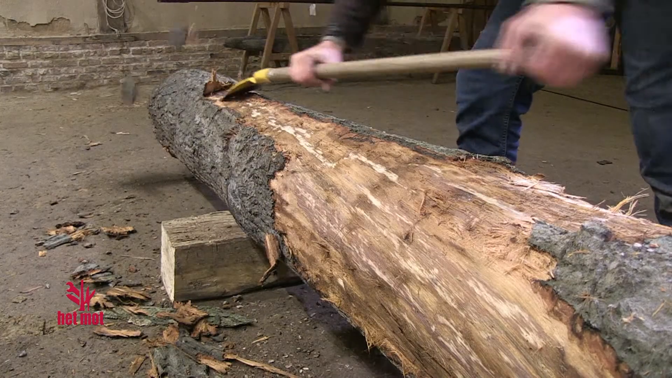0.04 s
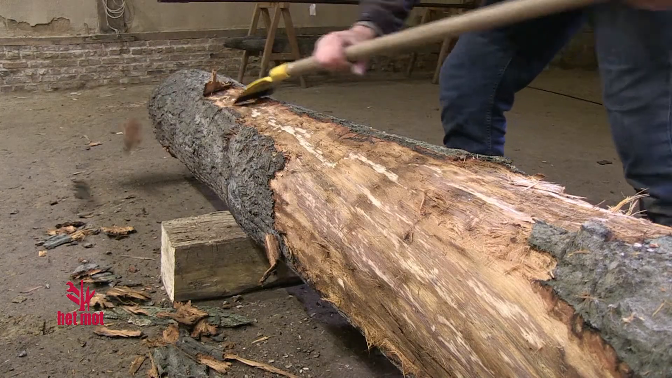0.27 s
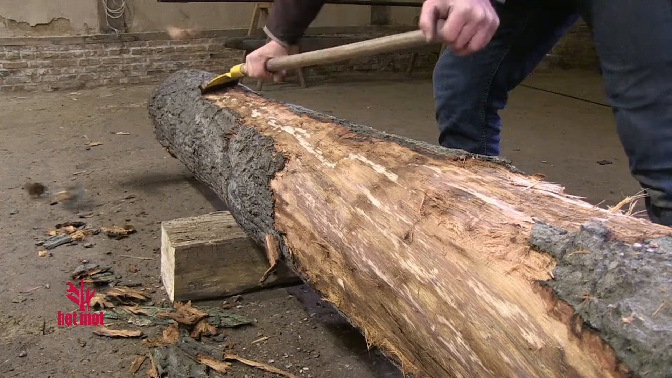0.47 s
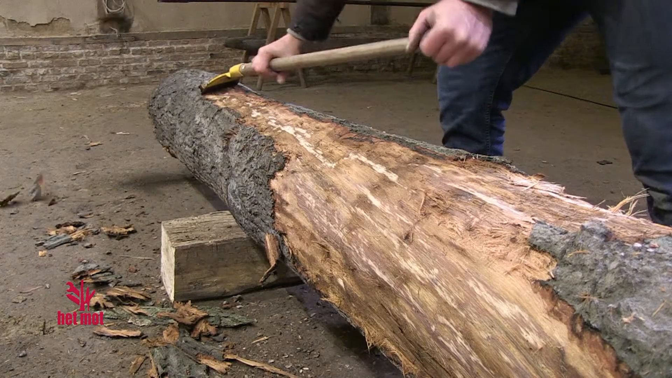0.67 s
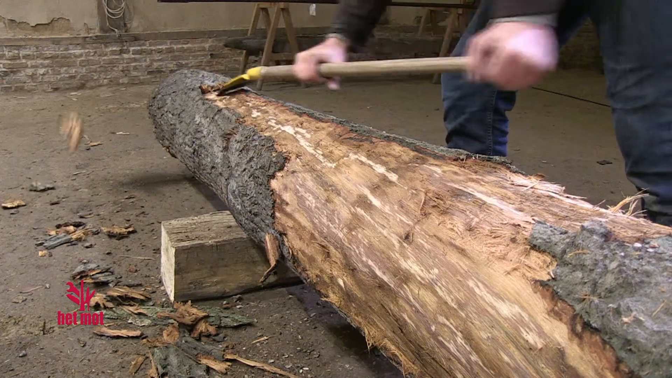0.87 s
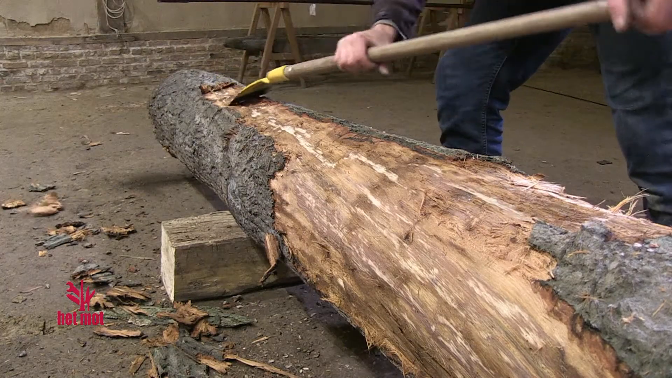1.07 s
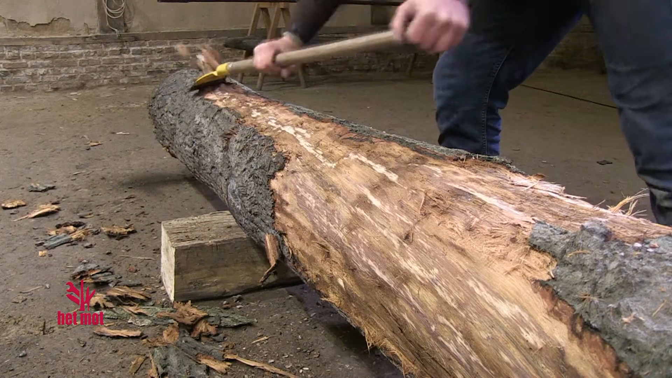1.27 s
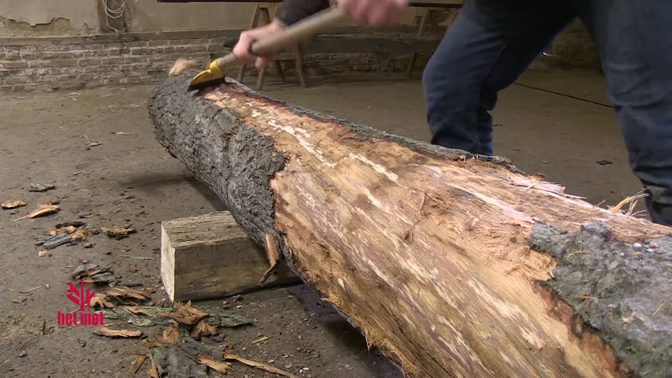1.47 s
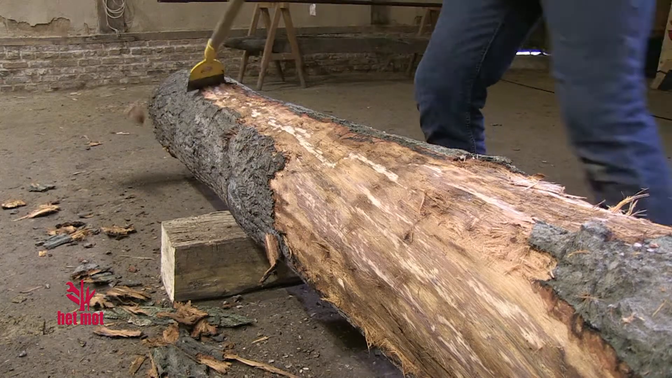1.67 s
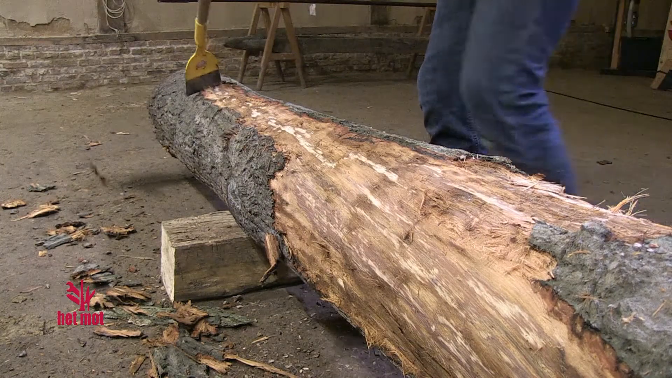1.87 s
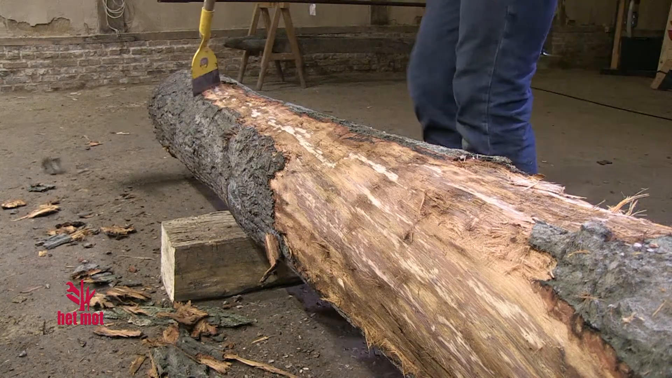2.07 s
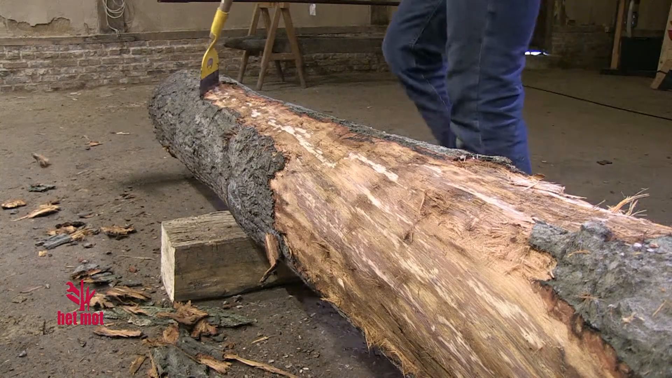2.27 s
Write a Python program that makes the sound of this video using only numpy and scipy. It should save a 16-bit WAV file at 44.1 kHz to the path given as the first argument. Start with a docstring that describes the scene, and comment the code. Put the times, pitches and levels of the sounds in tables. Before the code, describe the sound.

Metal blade scraping along a log, harsh ringing shoves tearing bark, then faint scratches and shuffling boots

```python
"""Bark spade on a log in a brick barn

A steel bark spade is dragged back and shoved along a log. Random slips of its edge drive a bank of
blade modes and log modes, plus a log hum; clumped clicks, filtered, are the tearing bark.
Knocks and dropped chips are damped wavelets with a noise crack; the log booms on its blocks.
Boots shuffle as dense filtered clicks; sparse decaying echoes are the barn; faint hiss lies under all."""
import sys
import numpy as np
from scipy import signal
from scipy.io import wavfile
from scipy.ndimage import uniform_filter1d

SR = 44100
rng = np.random.default_rng(int(sys.argv[2]) if len(sys.argv) > 2 else 0)


def inscribe(sig):
    """Save sig as 16-bit PCM at rate SR to the path in sys.argv[1].

    A 1-D sig is mono; a 2-D sig holds one channel per row.
    Samples are clipped to [-1, 1] before scaling.
    """
    pcm = np.round(np.clip(np.atleast_2d(sig).T, -1, 1) * 32767)
    wavfile.write(sys.argv[1], SR, pcm.astype(np.int16))


def volts_from_decibels(level):
    """Turn decibel levels (scalar or array-like) into linear amplitude factors."""
    exponent = np.asarray(level, float) / 20
    return 10 ** exponent


N = 101430
OFF_DB = -110  # spade level between strokes


def evened(x):
    """Scales to unit rms."""
    return x / np.sqrt(np.mean(x ** 2) + 1e-20)


def read(points, hz):
    """Interpolates a table over log frequency."""
    f, value = np.transpose(points)
    return np.interp(np.log(hz + 1), np.log(f + 1), value)


def add(mix, start_s, sound):
    """Adds a sound in place, cut at the end of the mix."""
    part = mix[round(start_s * SR):][:len(sound)]
    part += sound[:len(part)]


def above(x, hz):
    """Second-order high-pass."""
    return signal.sosfilt(signal.butter(2, hz, "high", fs=SR, output="sos"), x)


def coloured(x, points):
    """Causal minimum-phase filter with the given spectrum shape and unit power."""
    gain_db = np.maximum(read(points, abs(np.fft.fftfreq(4096, 1 / SR))), -80)
    log_gain = np.log(volts_from_decibels(gain_db))
    taps = np.fft.ifft(np.exp(signal.hilbert(log_gain).conj())).real[:2048]
    return signal.oaconvolve(x, taps / np.linalg.norm(taps))[:N]


def clicks(per_s, spread_db):
    """Random clicks of either sign, a few of them large, at unit rms."""
    size = volts_from_decibels(spread_db * np.minimum(rng.exponential(1, N), 4))
    signed = size * rng.choice([-1., 1.], N)
    return evened(signed * (rng.random(N) < per_s / SR))


def slow(smooth_s):
    """Smooth random curve of unit rms."""
    size = max(round(smooth_s * SR), 2)
    once = uniform_filter1d(rng.standard_normal(N), size)
    return evened(uniform_filter1d(once, size))


# hiss and rumble spectrum: (frequency [Hz], relative density [dB per Hz])
AIR_SPECTRUM = [(12, -18), (20, -1), (272, -3.5), (608, -12.5), (1180, -17.5), (2120, -23.5), (4240, -22),
                (5010, -30), (5750, -31), (7180, -27), (15200, -36)]


def air():
    """Steady hiss and rumble: filtered noise, slightly lumpy in level."""
    level_db = -56.5
    lumps = evened(volts_from_decibels(1.8 * slow(0.01)))
    return volts_from_decibels(level_db) * coloured(rng.standard_normal(N) * lumps, AIR_SPECTRUM)


# barn decay: (frequency [Hz], time to fall 60 dB [s])
BARN_DECAY = [(60, 1.), (300, 0.71), (1000, 0.55), (3000, 0.63), (6000, 0.57), (12000, 0.29)]


def barn(x):
    """Brick walls: sparse echoes of random sign, each band dying at its own speed."""
    first_echo_s = .008
    taps = np.zeros(SR)
    at = np.arange(0, SR - 20, 10)
    taps[at + rng.integers(0, 10, len(at))] = rng.choice([-1., 1.], len(at))
    hz, t, bands = signal.stft(taps, SR, nperseg=256)
    decay = volts_from_decibels(-60 * t / read(BARN_DECAY, hz)[:, None])
    tail = signal.istft(bands * decay, SR, nperseg=256)[1]
    tail = np.append(np.zeros(round(first_echo_s * SR)), tail)
    return signal.fftconvolve(x, tail / np.linalg.norm(tail))[:N]


# grit spectrum before tilt: (frequency [Hz], relative density [dB per Hz])
GRIT_SPECTRUM = [(300, 11.5), (1500, -1.5), (4000, 3.5), (8000, -8.5), (15000, -17)]
# boots on grit: (centre [s], half length to 1/e [s], level [dB], tilt [dB per octave])
BOOT_SHUFFLES = [(0.668, 0.096, -56.5, 4.5), (1.586, 0.19, -59, 2), (1.92, 0.065, -53, 0.),
                 (2.044, 0.11, -62.5, -1)]


def boots():
    """Dense grit under a sliding sole: filtered clicks swelling and fading."""
    t, grit = np.arange(N) / SR, clicks(9000, 1.9)
    out = np.zeros(N)
    for centre_s, half_s, level_db, tilt_db in BOOT_SHUFFLES:
        spectrum = [(hz, db + tilt_db * np.log2(hz / 4000)) for hz, db in GRIT_SPECTRUM]
        swell = np.exp(-((t - centre_s) / half_s) ** 2)
        out += coloured(volts_from_decibels(level_db) * swell * grit, spectrum)
    return out


# log rocking on its blocks: (time [s], envelope peak [dB])
LOG_BOOMS = [(0.358, -36), (1.222, -37.5)]


def booms():
    """Slow boom of the log: a low sine that swells and dies."""
    boom_hz, scale_s = 39, .02  # envelope peaks two scales after the start
    out, u = np.zeros(N), np.arange(SR // 2) / SR / scale_s
    for start_s, level_db in LOG_BOOMS:
        envelope = (u / 2) ** 2 * np.exp(2 - u)
        add(out, start_s, volts_from_decibels(level_db) * envelope * np.sin(2 * np.pi * boom_hz * scale_s * u))
    return out


# small knocks and chips: (time [s], first envelope peak [dB], pitch [Hz], cycles per envelope scale [-])
SMALL_KNOCKS = [(0.315, -37.5, 101.5, 1.63), (0.32, -32.5, 155, 3.9), (1.168, -35.5, 109, 1.3),
                (1.18, -31, 163, 1.2), (0.1421, -21.5, 660, 0.49), (.468, -46.5, 10600, 4.4),
                (.51, -41, 11700, 1.2), (0.741, -47, 2520, 0.92), (.805, -32, 970, 1.1),
                (1.15, -16.5, 630, 1.1), (.94, -40, 11900, 2.7), (1.626, -50, 309, 1.8),
                (1.65, -36.5, 2380, 0.88), (1.751, -33, 240, 0.6), (1.852, -35, 3780, 1),
                (1.895, -41.5, 433, 2.1), (1.918, -37.5, 459, 5), (1.93, -37.5, 430, 1.7),
                (1.959, -47, 145, 1.9), (2.083, -42, 2920, 1)]


def knocks():
    """Short damped wavelets, each landing edge by edge, opened by a wide noise crack."""
    snap_db, snap_s = -20, .003
    out, t = np.zeros(N), np.arange(400) / SR
    for start_s, level_db, hz, cycles in SMALL_KNOCKS:
        u = np.arange(0, 6 * cycles / hz, 1 / SR) * hz / cycles
        wavelet = 2 * u * np.exp(1 - 2 * u) * np.sin(2 * np.pi * u * cycles)
        for late_s, share in ((0, 1), (.0012, 0.17), (.0031, 0.46)):
            add(out, start_s + late_s, share * volts_from_decibels(level_db) * wavelet)
        crack_db = level_db + snap_db - 10 * np.log10(cycles + 500 / hz)
        add(out, start_s, volts_from_decibels(crack_db) * rng.standard_normal(400) * np.exp(-t / snap_s))
    return out


# modes favoured by where the edge rests: (start [s], end [s], mode [Hz], gain [dB])
FAVOURED_MODES = [(0, .17, 3960, 11), (.03, .08, 1220, 3), (.24, .32, 3960, 3), (1.06, 1.15, 3960, 4),
                  (1.67, 1.74, 6390, 7), (.9, .96, 2745, 3), (.94, 1., 3960, 4), (1.12, 1.152, 1220, 4),
                  (1.665, 1.8, 3960, 8), (1.955, 2.07, 2310, 6), (2.105, 2.3, 4940, 8),
                  (2.105, 2.3, 7070, 11), (2.105, 2.3, 7720, 10), (2.105, 2.3, 2310, -10),
                  (2.105, 2.3, 3960, -6)]


def ring(drive, modes, width_share, wander_db, tilt_db, lift=1):
    """Bank of modes; the moving contact favours now one, now another, and bends their pitch."""
    wander_s, drift_share, drift_s = .011, .003, .02
    out, power, t = np.zeros(N), 0, np.arange(N) / SR
    for hz, width_hz, db in modes:
        r = np.exp(-np.pi * width_hz * width_share / SR)
        gain_db = tilt_db * np.log2(hz / 4000)
        for start_s, end_s, mode_hz, favour_db in FAVOURED_MODES:
            if abs(mode_hz / hz - 1) < .03:
                gain_db = gain_db + favour_db * (t >= start_s) * (t < end_s)
        wander = evened(volts_from_decibels(wander_db * np.clip(slow(wander_s), -3, 1.5)))
        x = drive * wander * volts_from_decibels(gain_db)
        # one-pole resonator in a frame turning at the drifting mode pitch
        turn = np.exp(2j * np.pi * np.cumsum(hz * (lift + drift_share * slow(drift_s))) / SR)
        out += volts_from_decibels(db) * 2 * (turn * signal.lfilter([1 - r], [1, -r], x / turn)).imag
        power += volts_from_decibels(db) ** 2 * 2 * (1 - r) / (1 + r)
    return out / np.sqrt(power)


# log modes: (frequency [Hz], width [Hz], relative level [dB])
LOG_MODES = [(234, 12, -6), (488, 12, -6), (620, 160, -12), (800, 200, -12)]


def log(slips, level_db):
    """Slips ring the log; a wavering hum follows the log level and lingers faintly."""
    foot_hz = 169  # little radiates below
    hum_hz, hum_db, tail_db, tail_s = 306, -1, -10, .09
    modes = ring(volts_from_decibels(level_db) * above(slips, foot_hz), LOG_MODES, 1, 0.69, 0) / 2
    hum, keep = uniform_filter1d(volts_from_decibels(level_db + hum_db), 300), np.exp(-1 / (tail_s * SR))
    hum = hum + volts_from_decibels(tail_db) * signal.lfilter([1 - keep], [1, -keep], hum)
    pitch_hz = hum_hz * (1 + 0.0146 * slow(.02))
    return modes + hum * np.sin(2 * np.pi * np.cumsum(pitch_hz) / SR)


# bark spectrum: (frequency [Hz], relative density [dB per Hz])
BARK_SPECTRUM = [(90, -43), (170, -9.5), (300, 0.5), (900, -1), (1500, 1), (3500, -2), (5000, -5.5),
                 (5800, -8.5), (10000, -13), (15000, -21)]


def bark(level_db):
    """Fibres tear in clumps of clicks; the treble fades faster than the rest as the force drops."""
    split_hz, extra_db_per_db, full_db = 5100, 1, -29
    tears = evened(clicks(4000, 2.5) * volts_from_decibels(2.5 * slow(.003)))
    dull = signal.sosfilt(signal.butter(4, split_hz, fs=SR, output="sos"), tears)
    sharp = signal.sosfilt(signal.butter(4, split_hz, "high", fs=SR, output="sos"), tears)
    tears = dull + sharp * volts_from_decibels(extra_db_per_db * np.minimum(level_db - full_db, 0))
    return coloured(volts_from_decibels(level_db) * tears, BARK_SPECTRUM)


# blade modes, before width share and pitch lift:
# (frequency [Hz], width [Hz], relative level pressed hard [dB], relative level touching lightly [dB])
BLADE_MODES = [(1218.6, 99, -4.5, -1), (1540, 360, -22, -12.5), (2298, 43, -36.5, 1.5),
               (2468, 53, -9.5, -5), (2736, 71, -2.5, 1.5), (3280, 60, -5, -11), (3967, 37.5, 5, -2),
               (4210, 42, -22, 0.5), (4393, 84, -5, 3), (4890, 27, -13.5, -3), (6387, 110, -4.5, -5.5),
               (6650, 57, -8.5, -19.5), (7000, 55, -8, -16), (7640, 73, -11.5, -18.5),
               (8790, 79, -9.5, -16.5), (9360, 40, -7, -11), (10620, 39, -53, -20), (10600, 99, -31, -21),
               (12440, 113, -10, -22), (13300, 120, -41, -26), (14300, 160, -36, -25)]


def blade(slips, level_db, tilt_db):
    """Slips ring the blade, damped more when pressed hard; the ring dies as the edge lodges in bark."""
    foot_hz = 860  # little radiates below
    press_db, press_range_db, choke_s, wander_db = -27, 3., .0059, 3.
    hard_width_share, light_width_share = .85, .45
    t = np.arange(N) / SR
    last_touch_s = np.maximum.accumulate(t * (level_db > OFF_DB))
    choke = np.exp((last_touch_s - t) / choke_s)
    hard = 1 / (1.5 + np.exp((press_db - level_db) / press_range_db))
    free = choke * uniform_filter1d(1 - hard, 400)
    drive = volts_from_decibels(level_db) * above(slips, foot_hz)
    lift = np.where(t < 1.5, 1.012, 1.006)  # light touch lifts pitch, less with the spade upright
    hard_modes = [(hz, width_hz, db) for hz, width_hz, db, _ in BLADE_MODES]
    light_modes = [(hz, width_hz, db) for hz, width_hz, _, db in BLADE_MODES]
    pressed = ring(drive * np.sqrt(hard), hard_modes, hard_width_share, wander_db, tilt_db)
    light = ring(drive * np.sqrt(1 - hard), light_modes, light_width_share, wander_db, tilt_db, lift)
    return choke * pressed + np.sqrt(free) * light


# blade in contact with the log, one list per stroke, levels before the spade gain:
# (time [s], chatter [dB], tearing bark [dB], log [dB], ring tilt [dB per octave])
SPADE_STROKES = [
    [(0, -32, -44, -48, 0), (.02, -37, -47, -49, -1), (.034, -37, -47, -48, -1), (.039, -30, -33, -42, -2),
     (.048, -34, -41, -44, -2), (.066, -32, -41, -44, -2), (.09, -36, -42, -44, -2),
     (.12, -41, -45, -44, -1), (.146, -48, -50, -46, 0), (.17, -60, -64, -58, 0)],
    [(.19, -50, -52, -50, -4), (.206, -38, -42, -47, -4), (.235, -27, -33, -42, -2),
     (.254, -17, -25, -34, 0), (.261, -22, -28, -34, 0), (.267, -11, -22, -32, 0), (.274, -21, -27, -34, 0),
     (.295, -17, -22, -30, 1), (.314, -14, -15, -25, 1), (.324, -22, -16, -24, 0), (.333, -30, -20, -28, 0),
     (.339, -44, -34, -34, 0)],
    [(.74, -56, -52, -60, -2), (.76, -52, -62, -60, -4), (.796, -52, -64, -60, -4),
     (.804, -38, -40, -44, 1), (.83, -41, -43, -58, 1), (.895, -42, -45, -62, 1), (.916, -30, -35, -44, 0),
     (.94, -34, -39, -46, 0), (.98, -38, -43, -48, 0), (1.005, -50, -52, -52, 0), (1.035, -56, -60, -56, 0)],
    [(1.043, -52, -54, -52, -4), (1.049, -41, -43, -48, -4), (1.065, -39, -42, -46, -3),
     (1.1, -27, -35, -40, -2), (1.114, -24, -33, -38, -1), (1.12, -21, -25, -33, 0),
     (1.15, -18, -22, -23, 0), (1.162, -22, -29, -25, 2), (1.174, -25, -20, -24, 0),
     (1.186, -19, -16, -23, 1), (1.196, -30, -22, -28, 0), (1.203, -44, -36, -36, 0)],
    [(1.665, -62, -64, -58, 3), (1.69, -50, -56, -52, 1), (1.73, -55, -62, -56, 2),
     (1.748, -66, -70, -64, 0), (1.756, -56, -66, -66, -1), (1.8, -68, -76, -72, 0)],
    [(1.955, -60, -70, -70, -1), (2., -64, -74, -72, -2), (2.07, -70, -78, -76, -2)],
    [(2.105, -66, -80, -80, 4), (2.125, -60, -78, -78, 2), (2.16, -62, -78, -78, 1),
     (2.205, -57, -78, -78, 0), (2.25, -60, -78, -78, 1), (2.3, -59, -78, -78, 1)],
]


def spade():
    """The edge's chattering slips drive blade and log while bark tears."""
    spade_db = -1.5
    t, level_db, tilt_db = np.arange(N) / SR, np.full((3, N), OFF_DB, float), np.zeros(N)
    for rows in SPADE_STROKES:
        s, *dbs, bright_db = np.transpose(rows)
        tilt_db += np.interp(t, s, bright_db, 0, 0)
        level_db = np.maximum(level_db, [np.interp(t, s, db, OFF_DB, OFF_DB) for db in dbs])
    chatter_db, bark_db, log_db = level_db
    slips = clicks(3500, 3.)
    return volts_from_decibels(spade_db) * (blade(slips, chatter_db, tilt_db) + bark(bark_db) + log(slips, log_db))


def scene():
    """Near sounds, their barn echoes and the air, in mono."""
    barn_db = -14
    near = spade() + knocks() + booms() + boots()
    return (near + volts_from_decibels(barn_db) * barn(near) + air())[None]


def roll_off(x):
    """The treble ends steeply here."""
    return signal.sosfilt(signal.butter(12, 15400, fs=SR, output="sos"), x)


def record(dry):
    """Limits the band with a linear-phase low-pass and returns the finished mix."""
    edge_hz = 14950
    taps = signal.firwin(511, edge_hz, window=("kaiser", 9), fs=SR)
    mix = signal.oaconvolve(dry, taps[None], "same")
    return roll_off(mix)


dry = scene()
out = record(dry)
inscribe(out)
```